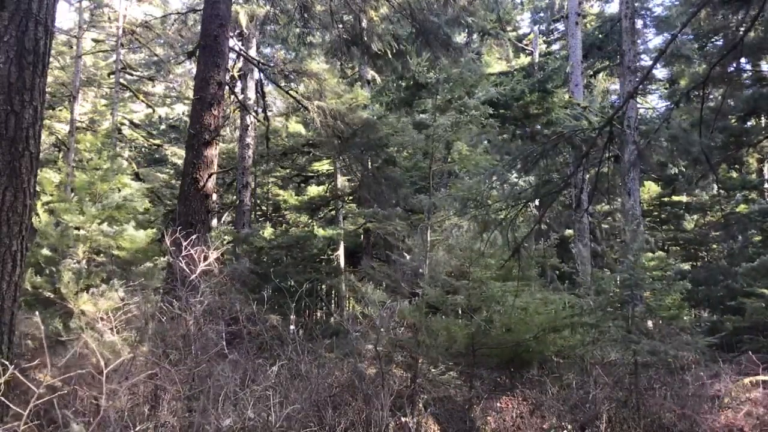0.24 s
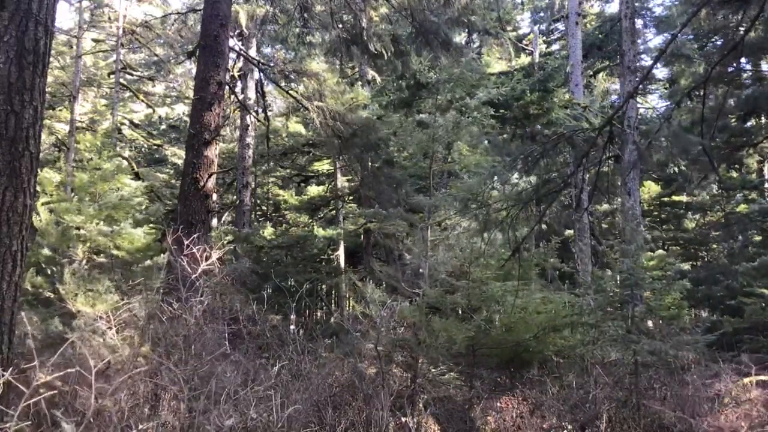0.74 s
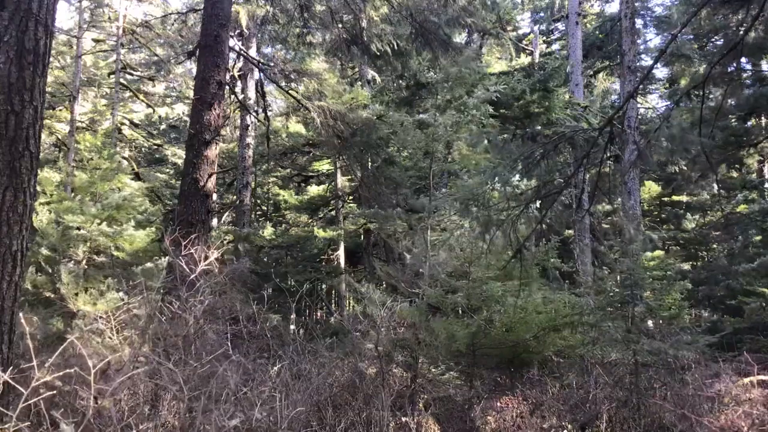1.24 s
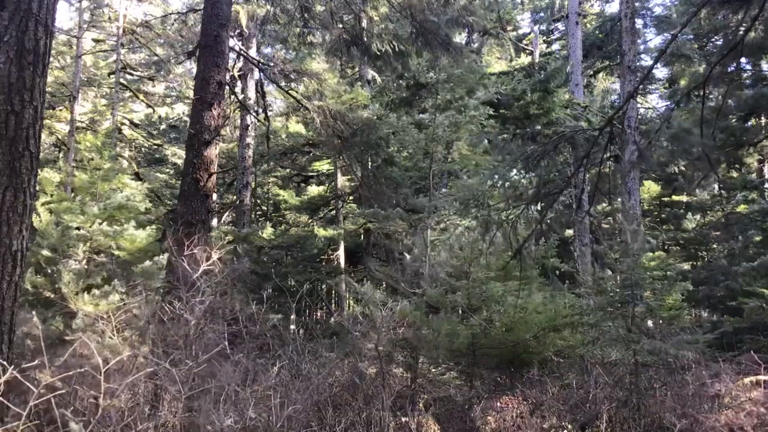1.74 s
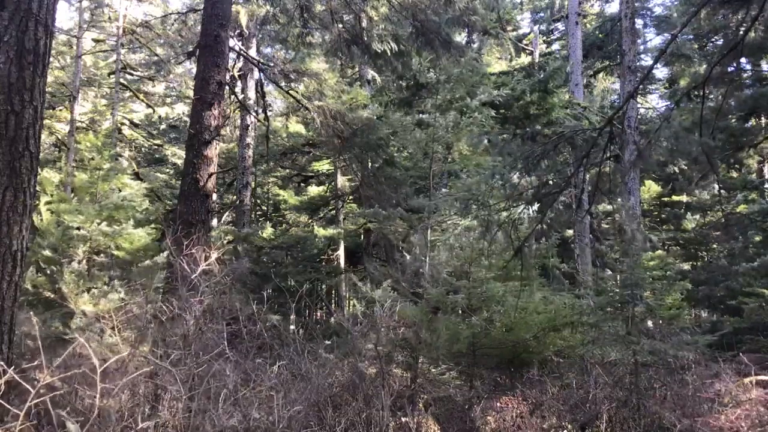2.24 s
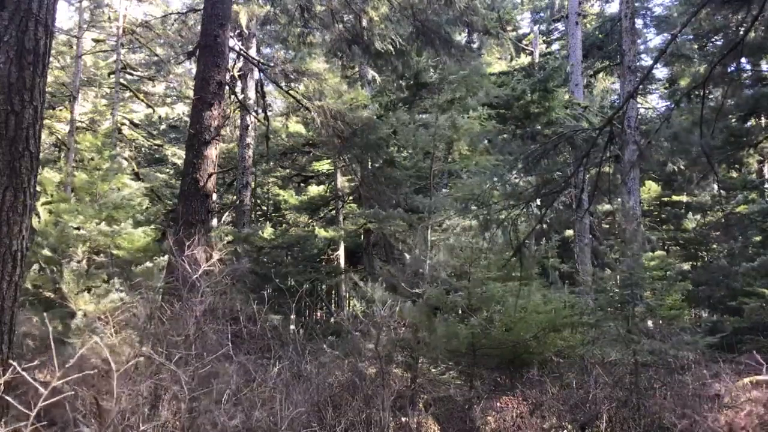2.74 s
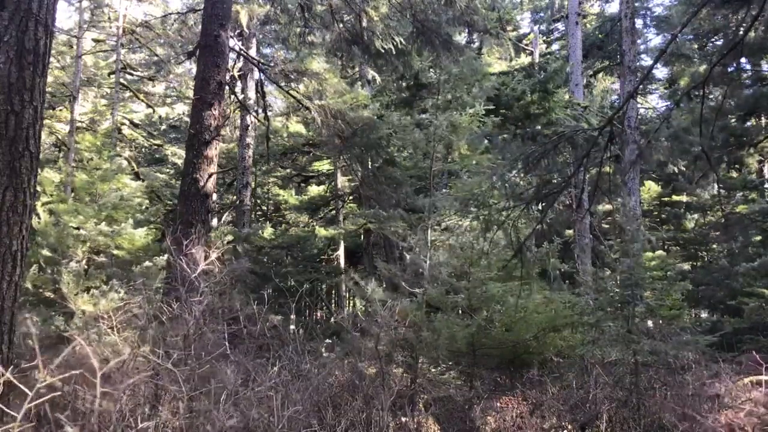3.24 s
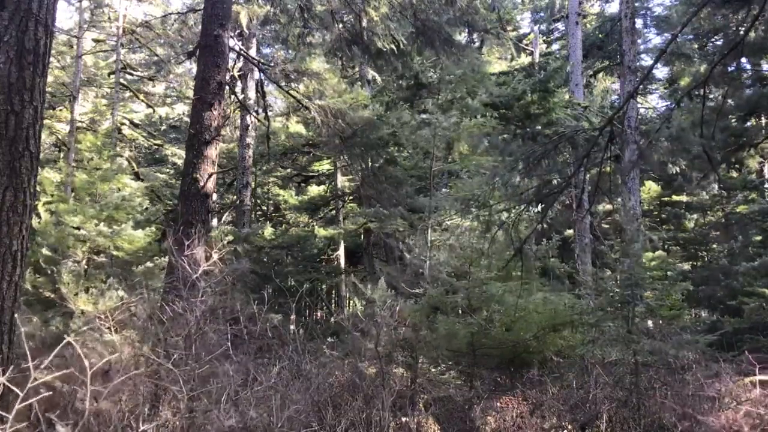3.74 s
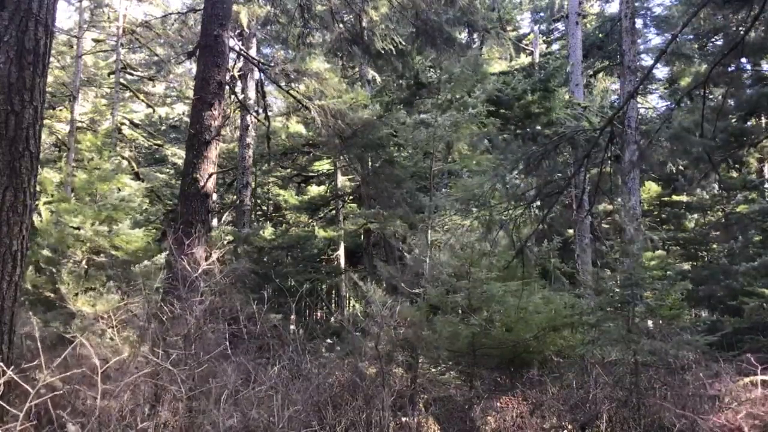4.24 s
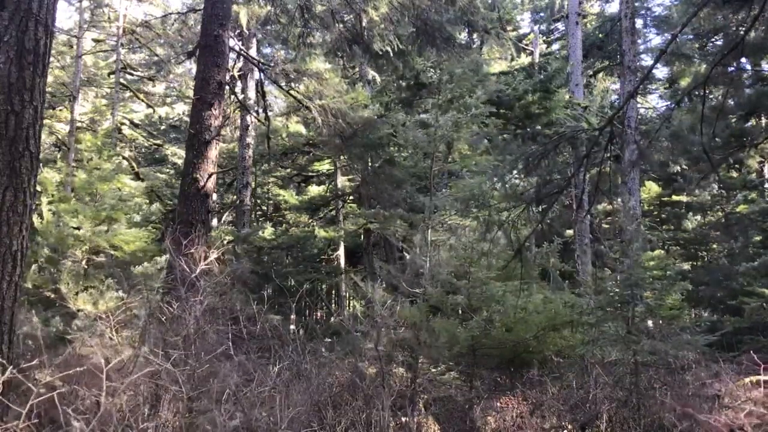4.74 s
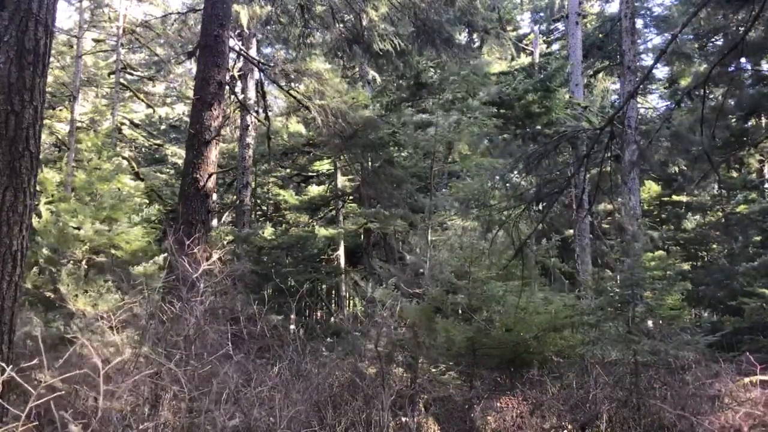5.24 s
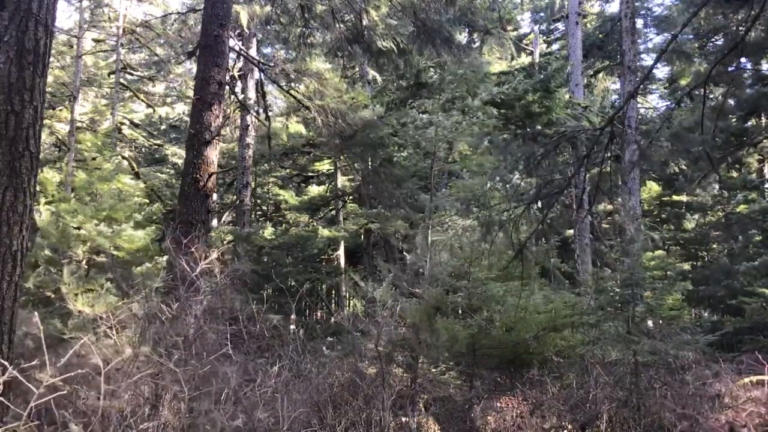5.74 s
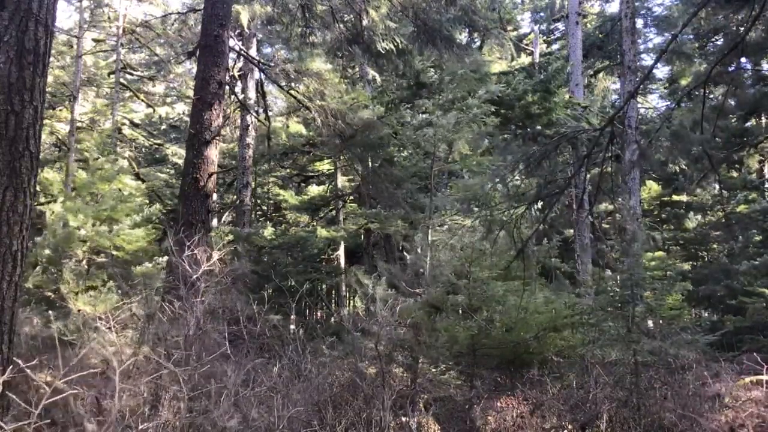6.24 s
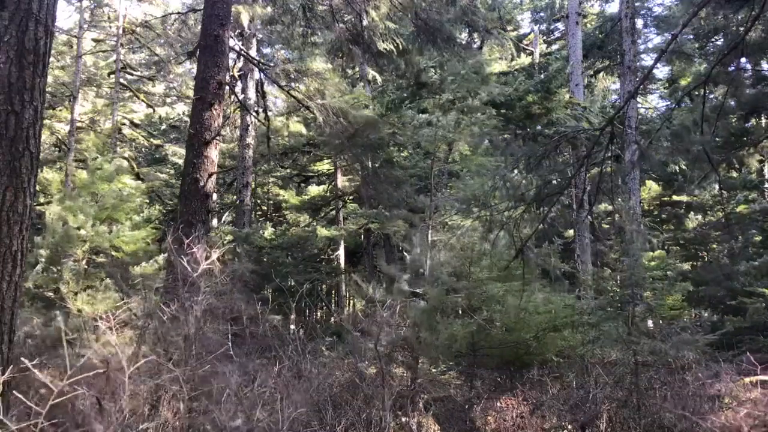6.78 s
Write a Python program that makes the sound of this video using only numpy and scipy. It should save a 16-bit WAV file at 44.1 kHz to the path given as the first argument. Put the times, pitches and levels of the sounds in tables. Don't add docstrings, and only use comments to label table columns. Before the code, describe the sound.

A low, soft roar of wind in distant conifer crowns rises and falls with gusts, over moaning boughs and an even rush of needles. A faint bird trills rapidly at first, then another twitters in quick sliding bursts, blurred by the trees. Tiny dry ticks appear later. Outdoors in dense forest, mono, small microphone with faint hiss.

```python
import sys
import numpy as np
from scipy import signal
from scipy.fft import rfft, irfft, next_fast_len
from scipy.io import wavfile
from scipy.ndimage import uniform_filter1d

SR = 44100
rng = np.random.default_rng(int(sys.argv[2]) if len(sys.argv) > 2 else 0)


def master(y):
    cut = np.clip(np.atleast_2d(y).T, -1, 1)
    pcm = np.round(cut * 32767)
    wavfile.write(sys.argv[1], SR, pcm.astype(np.int16))


def nominal_scale(level):
    x = np.asarray(level, float) / 20
    return 10 ** x


N = 309141


# time in seconds, crown roar in dB, lean to thin boughs in dB, deep rumble in dB.
GUSTS = [(0, -39, 0, -60), (.5, -37.5, 0, -57), (1.1, -37.5, 0, -61), (1.5, -40.5, -6.5, -65),
         (1.8, -35, 0, -64), (2.2, -36, -4.5, -65), (2.45, -32, 0, -65), (2.7, -41.5, -8, -60),
         (3.0, -32, -2, -66), (3.25, -34.5, 7, -51), (3.6, -36.5, 0, -58), (4.4, -36, 4.5, -56),
         (4.7, -37, -4, -58), (5.1, -38.5, -2, -55), (5.5, -35.5, 2, -59), (6.0, -36.5, 0.5, -61),
         (6.3, -36, 1.5, -56), (7.01, -36, 2.5, -58)]
# frequency in Hz, density in dB per Hz.
ROAR_SPECTRUM = [(59, -46), (100, -19), (159, -1), (205, 3), (232, 3.5), (300, -6), (390, -31), (660, -120)]
MOAN_SPECTRUM = [(150, -18), (260, -4), (355, -5.5), (511, -13.5), (900, -19.5), (1170, -23), (1980, -120)]
RUSH_SPECTRUM = [(510, -50), (860, -11), (942, -7), (1150, -4.5), (1400, -9), (2790, -14), (3700, -21),
                 (4640, -29), (7500, -34.5), (9750, -45.5), (16500, -120)]
RUMBLE_SPECTRUM = [(15, -70), (25, -49), (59, -28.5), (120, -6.5), (160, -11), (260, -120)]


def wind():
    roar_db, lean_db, rumble_db = in_time(GUSTS)

    crowns = coloured(ROAR_SPECTRUM)
    split = signal.butter(2, 212, fs=SR, output="sos")
    thick = signal.sosfiltfilt(split, crowns)
    thin = crowns - thick
    roar = nominal_scale(roar_db) * (nominal_scale(-lean_db) * thick + nominal_scale(lean_db) * thin)

    moan_db = -41 + 0.12 * (roar_db - roar_db.mean())
    moan = nominal_scale(moan_db) * coloured(MOAN_SPECTRUM)

    fade_db = 0.14 * np.arange(N) / SR
    rush = nominal_scale(-46 - fade_db + 0.049 * drift(7.4)) * coloured(RUSH_SPECTRUM)

    rumble = nominal_scale(rumble_db) * coloured(RUMBLE_SPECTRUM)
    return rumble + roar + moan + rush


def birds():
    song = trill() + slurs() + glides() + chips()
    song = song * nominal_scale(1.8 * drift(300))
    near_boughs = scatter(level_db=-6, t60_s=0.05)
    far_trunks = scatter(level_db=-5, t60_s=0.45)
    return song + signal.fftconvolve(song, near_boughs + far_trunks)[:N]


# centre in seconds, peak in dB, sharpening in Hz.
TRILL_NOTES = [(0.747, -62.5, 0), (0.843, -60.5, 0), (0.939, -60.5, 30), (1.032, -62, 30),
               (1.123, -62, -80), (1.216, -63.5, -30), (1.322, -62.5, 0), (1.422, -64, 60),
               (1.517, -63.5, 0), (1.614, -62, 0), (1.717, -60.5, 150), (1.816, -62, 140), (1.909, -60, 30),
               (2.005, -62.5, 0)]
# length in seconds, starting pitch in Hz, ending pitch in Hz.
TRILL_SHAPE = (0.032, 4460, 4900)


def trill():
    track = np.zeros(N)
    length_s, from_hz, to_hz = TRILL_SHAPE
    for centre_s, peak_db, sharp_hz in TRILL_NOTES:
        note = whistle(length_s, from_hz + sharp_hz, to_hz + sharp_hz, peak_db - 2.2)
        add(track, centre_s - length_s / 2, note)
    return track


# start in seconds, length in seconds, starting pitch in Hz, ending pitch in Hz, peak in dB.
FALLING_SLURS = [(2.392, .014, 5250, 4600, -63), (2.4, .014, 4600, 4300, -57),
                 (2.462, .026, 4840, 4040, -63), (3.8, .014, 4450, 4150, -57),
                 (3.812, .024, 4000, 3200, -58), (4.162, .022, 4550, 4200, -62),
                 (4.158, .03, 3700, 3350, -59), (3.852, .032, 4850, 4200, -55.5),
                 (5.518, .016, 3900, 3250, -58), (5.65, .016, 3900, 3300, -58),
                 (5.661, .014, 5750, 5400, -61), (5.624, .011, 4400, 4200, -55),
                 (2.64, .02, 5000, 4600, -65), (.96, .03, 4600, 4300, -63), (2.345, .022, 4600, 4300, -66)]
RISING_SLURS = [
    (.943, .03, 6480, 7200, -68),
    (5.418, .022, 4540, 4850, -63),
    (5.6, .028, 4650, 4950, -62),
    (5.7, .026, 4750, 4950, -64),
    (5.759, .011, 5150, 5600, -59),
    (5.788, .026, 4200, 4750, -60),
    (5.812, .016, 4650, 4900, -59),
    (.92, .025, 3950, 4150, -62),
]


def slurs():
    track = np.zeros(N)
    for start_s, *note in FALLING_SLURS + RISING_SLURS:
        add(track, start_s, whistle(*note))
    return track


# time in seconds, pitch in Hz, level in dB.
BENT_SLURS = [
    [(2.503, 5750, -68), (2.511, 5800, -63), (2.521, 5880, -57), (2.531, 5420, -64), (2.545, 4750, -63),
     (2.552, 4500, -72)],
    [(2.559, 5450, -60), (2.566, 5380, -54), (2.573, 4800, -59), (2.58, 4450, -65), (2.59, 4850, -59),
     (2.602, 5100, -62), (2.612, 4850, -70)],
    [(2.614, 5200, -68), (2.622, 5080, -64), (2.635, 4830, -57), (2.648, 4580, -58), (2.658, 4450, -64),
     (2.666, 4350, -72)],
    [(3.826, 4400, -70), (3.834, 4700, -60), (3.841, 5150, -64), (3.845, 5500, -54), (3.854, 5450, -60)],
    [(3.856, 6250, -72), (3.866, 6270, -64), (3.884, 6050, -64), (3.905, 5680, -63), (3.923, 5320, -57),
     (3.931, 5000, -68), (3.94, 4600, -59), (3.96, 4050, -59), (3.98, 3600, -58)],
    [(4.047, 5550, -68), (4.058, 5250, -60), (4.068, 5030, -55), (4.078, 4780, -57), (4.084, 4650, -70)],
    [(4.126, 5250, -72), (4.136, 5050, -64), (4.146, 4750, -64), (4.152, 4500, -55), (4.16, 4300, -66)],
    [(5.492, 3900, -68), (5.502, 4400, -66), (5.512, 4650, -64), (5.53, 4500, -68), (5.542, 4500, -63),
     (5.552, 4400, -72)],
    [(5.556, 4150, -68), (5.568, 4550, -58), (5.578, 4800, -56), (5.588, 4700, -68), (5.599, 4600, -63),
     (5.612, 4250, -60), (5.621, 3950, -60), (5.628, 4450, -49), (5.634, 5000, -53)],
    [(5.632, 5150, -66), (5.638, 5450, -61), (5.644, 5150, -62), (5.656, 5250, -68)],
]


def glides():
    track = np.zeros(N)
    for points in BENT_SLURS:
        add(track, points[0][0], glide(points))
    return track


# centre in seconds, pitch in Hz, peak in dB.
FAR_CHIPS = [(.603, 4600, -62), (2.662, 5450, -65), (2.529, 4000, -61), (1.5, 5500, -67), (5.91, 4550, -64),
             (.63, 4400, -66), (.919, 6020, -67), (.79, 4650, -66), (1.05, 4400, -65), (1.17, 4400, -68),
             (1.468, 4850, -65), (1.99, 5150, -69), (2.2, 4150, -63), (2.322, 4500, -62), (2.81, 4550, -59),
             (3.825, 5550, -61), (4.717, 4280, -61), (4.853, 4500, -63), (4.957, 4350, -62),
             (5.045, 4700, -68), (5.662, 4200, -62), (5.675, 5050, -65), (5.734, 5100, -65),
             (5.585, 3600, -60), (5.772, 3900, -64), (5.772, 4800, -64), (4.016, 4250, -63),
             (4.035, 5550, -66), (6.621, 6420, -67)]


def chips():
    track = np.zeros(N)
    length_s, drop_hz = 0.014, 250
    for centre_s, hz, peak_db in FAR_CHIPS:
        chip = whistle(length_s, hz + drop_hz / 2, hz - drop_hz / 2, peak_db)
        add(track, centre_s - length_s / 2, chip)
    return track


# time in seconds, peak in dB.
NEEDLE_TICKS = [
    (3.5601, -61),
    (4.0112, -64),
    (5.3395, -67),
    (5.9646, -64),
    (6.1255, -67),
    (6.4805, -61),
    (6.6464, -66),
    (6.7095, -61),
]


def ticks():
    track = np.zeros(N)
    t = np.arange(26) / SR
    snap = np.hanning(len(t)) * np.sin(2 * np.pi * 11800 * t)
    for s, peak_db in NEEDLE_TICKS:
        add(track, s - 0.0003, nominal_scale(peak_db - 1.5) * snap)
    return track


# frequency in Hz, density in dB per Hz.
HISS_SPECTRUM = [(3800, -22.5), (6500, -6), (10000, -4.5), (13000, -9), (17500, -11.5)]


def microphone_hiss():
    return nominal_scale(-72 + 0.4 * drift(10)) * coloured(HISS_SPECTRUM)


def whistle(length_s, from_hz, to_hz, peak_db):
    along = np.arange(int(length_s * SR)) / (length_s * SR)
    pitch = from_hz + (to_hz - from_hz) * along
    phase = 2 * np.pi * np.cumsum(pitch) / SR
    swell = np.sin(np.pi * along) ** 0.41
    return nominal_scale(peak_db) * swell * np.sin(phase)


def glide(points):
    s, hz, level_db = np.transpose(points)
    t = np.arange(s[0], s[-1], 1 / SR)
    waver_hz, waver_per_s = 45, 300
    knots = rng.standard_normal(40)
    waver = waver_hz * np.interp((t - s[0]) * waver_per_s, np.arange(len(knots)), knots)
    pitch = uniform_filter1d(np.interp(t, s, hz) + waver, size=90, mode="nearest")
    tone = np.sin(2 * np.pi * np.cumsum(pitch) / SR)
    soft_ends = signal.windows.tukey(len(t), 0.1)
    return nominal_scale(np.interp(t, s, level_db)) * soft_ends * tone


def scatter(level_db, t60_s):
    t = np.arange(SR // 2) / SR
    decay = nominal_scale(-60 * t / t60_s)
    build_up = np.minimum(t / t60_s / 0.062, 1)
    cloud = rng.standard_normal(len(t)) * decay * build_up
    tone = rfft(cloud, SR)
    local_power = uniform_filter1d(abs(tone) ** 2, size=25)
    even = irfft(tone / np.sqrt(local_power), SR)[:len(t)]
    return nominal_scale(level_db) * even / np.linalg.norm(even)


def coloured(spectrum):
    size = next_fast_len(N)
    hz, level_db = np.transpose(spectrum)
    grid_hz = np.arange(size // 2 + 1) * SR / size + 1e-3
    gain = nominal_scale(np.interp(np.log(grid_hz), np.log(hz), level_db, left=-200, right=-200))
    noise = irfft(rfft(rng.standard_normal(size)) * gain, size)[:N]
    return noise / noise.std()


def in_time(rows):
    s, *columns = np.transpose(rows)
    return [np.interp(np.arange(N) / SR, s, column) for column in columns]


def drift(rate):
    count = int(N / SR * rate) + 2
    return np.interp(np.arange(N) / SR * rate, np.arange(count), rng.standard_normal(count))


def add(track, s, sound):
    at = round(s * SR)
    track[at:at + len(sound)] += sound[:N - at]


def scene():
    return (wind() + birds() + ticks() + microphone_hiss())[None]


# centre in Hz, width in Hz, gain in dB.
HOUSING_PEAKS = [(66, 14, -1), (343, 33, 2.5), (876, 217, -5.5), (3780, 460, 1), (4180, 250, -0.1),
                 (7460, 1500, -3.5), (9000, 900, 0.5), (10060, 1100, -3)]


def housing(sound):
    for hz, width_hz, gain_db in HOUSING_PEAKS:
        b, a = signal.iirpeak(hz, hz / width_hz, SR)
        sound = sound + (nominal_scale(gain_db) - 1) * signal.lfilter(b, a, sound)
    return sound


def roll_off(x):
    return signal.sosfilt(signal.butter(12, 15700, fs=SR, output="sos"), x)


def record(dry):
    mix = housing(dry)
    return roll_off(mix)


dry = scene()
out = record(dry)
master(out)
```